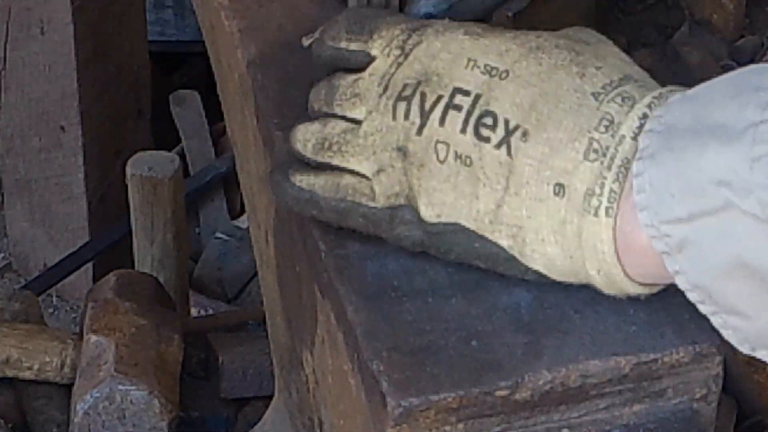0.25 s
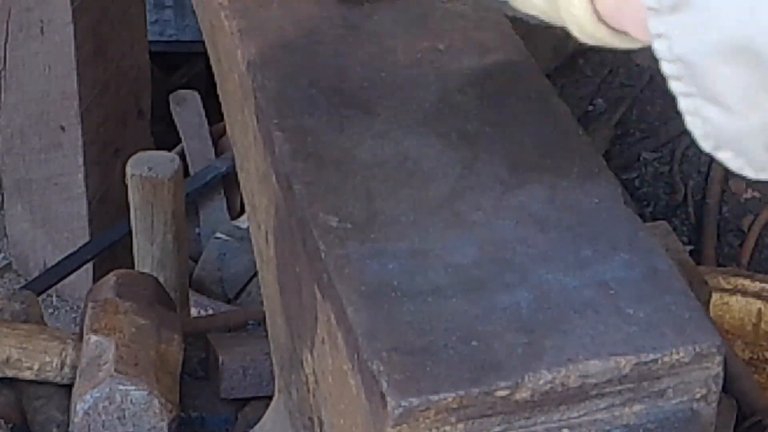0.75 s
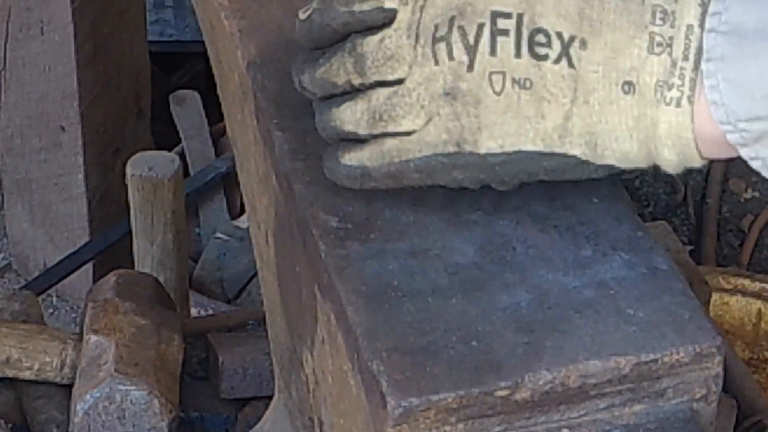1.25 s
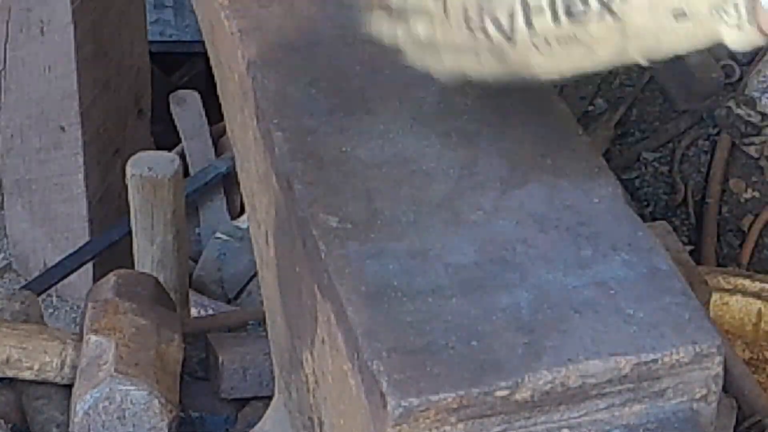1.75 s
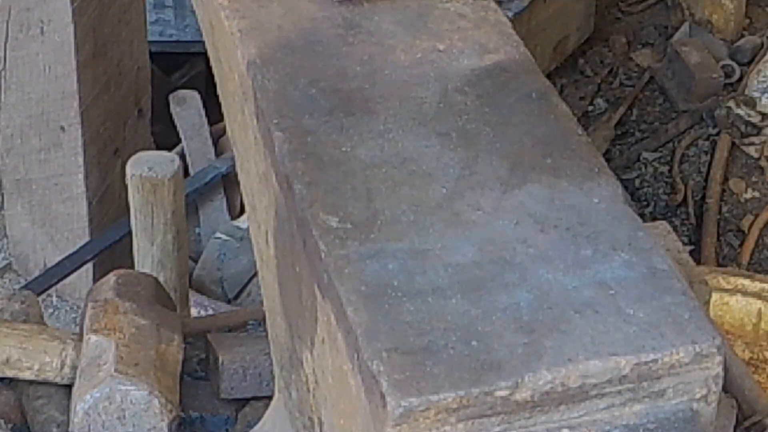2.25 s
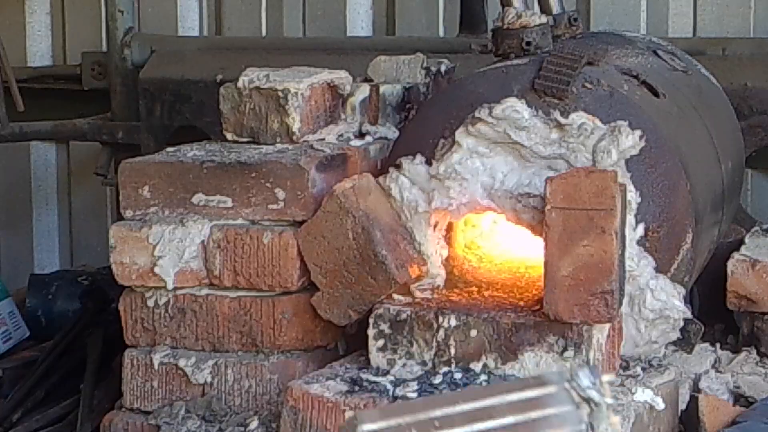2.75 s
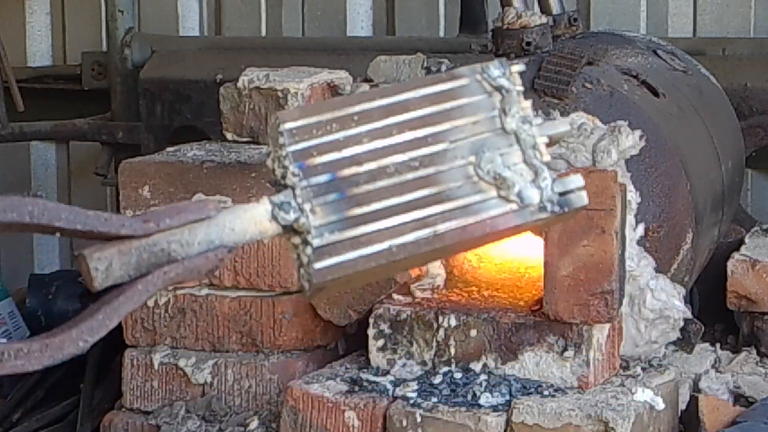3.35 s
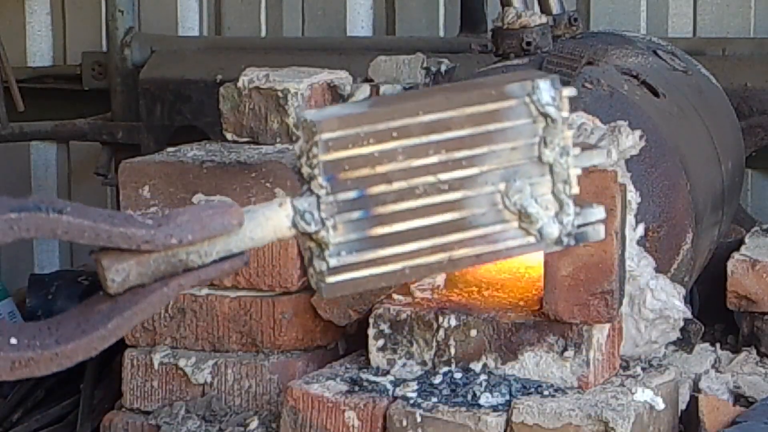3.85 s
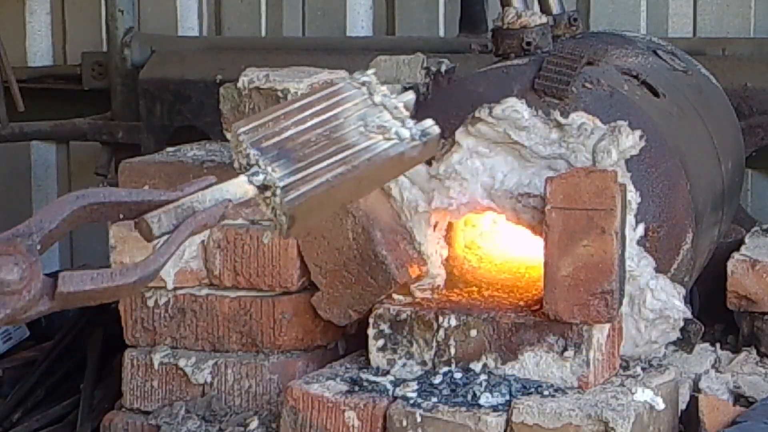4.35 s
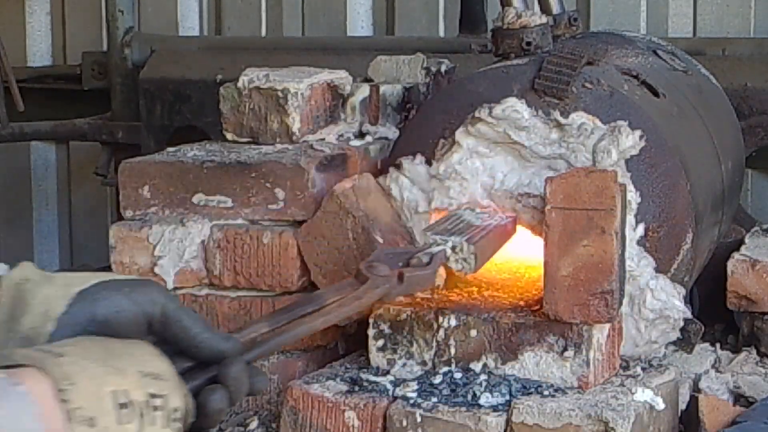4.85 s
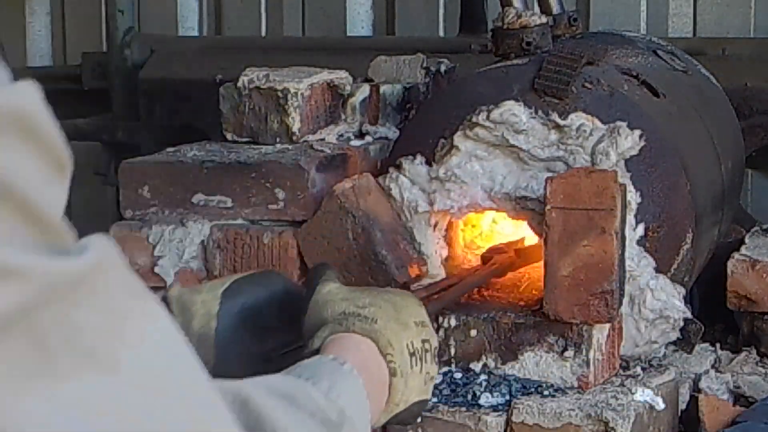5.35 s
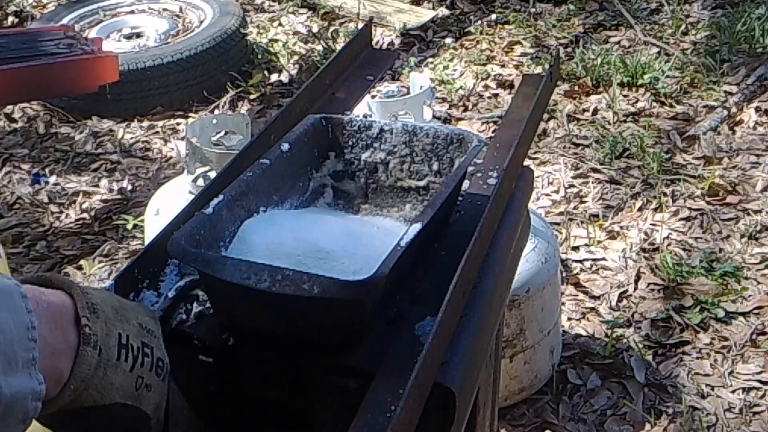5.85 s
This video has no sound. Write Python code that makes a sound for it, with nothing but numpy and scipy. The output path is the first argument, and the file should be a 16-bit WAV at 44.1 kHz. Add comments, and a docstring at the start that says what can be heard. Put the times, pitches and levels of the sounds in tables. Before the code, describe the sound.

From 0 to 2.6 s, close at an anvil, a thin quiet hiss lies under small steel strips being stacked. A soft low glove rub fades by 0.25 s. Sharp bright clicks with very short rings and small dull knocks come at about 0.06, 0.6, 0.87, 1.12, 1.57-1.6 and 2.32 s, with tiny ticks between, faint gritty slides near 2.05 and 2.5 s, and barely audible gliding hums. The loudest clack at 2.61 s is cut short into a sliver of silence. At 2.65 s a close propane forge starts abruptly: steady hissing jet with a reedy whistle near 2.8 kHz, fizzing treble and low flame roar, swelling gently to 4.2 s, then easing. Tongs scrape brick at 4.65, faintly at 4.96, and repeatedly from 5.37 s. At 5.65 s the burner is suddenly farther away in a yard; dry leaves crunch at 5.83 and in a cluster from 6.04 s.

```python
"""A smithy, heard in three scenes with hard cuts. At the anvil steel strips click, slide and ring over a thin hiss:
ticks are bursts of decaying noise through resonances, slides are swarms of random grains.
After a short silence a propane forge burns close by: flame and gas jet are noise shaped by chamber and burner tube,
and tongs scrape on brick. Then the burner is heard from the yard, where steps crunch in dry leaves."""
import sys
import numpy as np
from scipy import signal
from scipy.fft import rfft, irfft
from scipy.io import wavfile
from scipy.ndimage import map_coordinates

SR = 44100
rng = np.random.default_rng(int(sys.argv[2]) if len(sys.argv) > 2 else 0)


def store_pcm(level_fs):
    """Save levels as 16-bit WAV."""
    pcm = np.round(np.clip(level_fs, -1, 1) * 32767).astype(np.int16)
    wavfile.write(sys.argv[1], SR, np.atleast_2d(pcm).T)


N = 269010
HZ, T = np.fft.rfftfreq(N, 1 / SR), np.arange(N) / SR  # frequency and time axes
BENCH_END, FORGE_START, YARD_START = 2.6135, 2.653, 5.655  # s

# Strip against strip. Each row: start in seconds, relative tick level in dB, relative level of the knock
# into the anvil in dB, chatter decay in seconds, strongest ring in Hz, lift of the lower bending ring in dB.
CLICKS = [(0.06, -3.5, -11, 0.0059, 6000, -6), (0.1092, -19, -39.5, .002, 6000, -15),
          (0.6007, -5, -14, 0.0016, 9400, -11), (0.8728, -6.5, -24, 0.004, 8760, -20),
          (1.1158, -3, -10.5, 0.0046, 5400, -15), (1.398, -24.5, -48, .001, 13400, -15),
          (1.5687, -7, -12.5, 0.0013, 12000, -10), (1.6065, -9, -18.5, 0.0019, 11600, -8),
          (1.734, -24, -53, 0.00097, 8580, -15), (2.178, -21.5, -44.5, .0015, 7400, -15),
          (2.3188, -7, -24, 0.0016, 7600, -9), (2.6110, 5, -8.5, 0.0034, 7400, 8)]
# Brightness of steel touching steel. Each row: frequency in Hz, level in dB.
STEEL_COLOUR = [(150, -42), (1000, -31), (3000, -19), (4500, -9), (6000, -4), (7500, -1), (9700, 0),
                (12400, -1), (13600, -7), (15000, -7), (15800, -12)]
# Strips sliding into line. Each row: start in seconds, relative level in dB, length scale in seconds,
# ring in Hz, gritty low part in dB relative to the slide.
SLIDES = [(2.025, -38, 0.027, 6440, -12.5), (2.094, -44, 0.024, 7500, -2.5), (2.479, -38, .025, 6000, -1.5),
          (2.518, -47.5, 0.061, 11000, -20), (2.56, -39.5, 0.037, 7500, -27)]
# Spectrum of the gas jet. Each row: frequency in Hz, level in dB.
JET = [(300, -22), (750, -7.5), (1200, -1.5), (1600, -3.5), (2400, 3.5), (3400, -1.5), (4300, 1),
       (5200, -1.5), (6400, -2.5), (7700, -6), (9000, -13), (11000, -19), (14000, -16.5), (15500, -31)]
# Resonances of the burner tube. Each row: centre in Hz, width in Hz, lift in dB.
TUBE = [(826, 29, 13.5), (926, 29, 11.5), (1030, 20, 4), (1170, 32, 3), (1396, 68, 4), (1494, 57, 8.5),
        (1702, 78, 6), (1944, 67, 4), (2023, 51, 3), (2385, 40, 2.5), (2500, 66, 4), (2801.5, 111, 17),
        (2946, 174, 10), (3260, 110, 4), (3928, 108, 10.5), (4070, 127, 8.5), (4266, 165, 5.5),
        (4620, 220, 9), (4754, 130, 10), (5672, 183, 8.5), (5858, 324, 11), (6926, 160, 12.5),
        (8450, 270, 9.5)]
# Dry leaves crushed underfoot. Each row: start in seconds, relative level in dB, length scale in seconds,
# ring in Hz, low crack in dB relative to the crunch.
CRUNCHES = [(5.834, -26, 0.021, 4470, -17), (6.035, -27.5, .015, 4200, -9.5), (6.057, -26, 0.0096, 4570, 1),
            (6.07, -28, .014, 5900, -4), (6.087, -29.5, 0.023, 5750, -14)]
# The flame swells once and eases off on both sides of its height.
ROAR_TOP_S, ROAR_TOP_DB, ROAR_RISE_DB_PER_S, ROAR_FALL_DB_PER_S = 4.24, -37.5, 1.2, 2


def amp(db):
    """Decibels are a logarithmic measure of amplitude, 20 dB to a factor of ten."""
    return 10 ** (np.asarray(db) / 20)


def unit(x):
    """Normalisation: dividing by the root mean square gives unit power."""
    return x / np.sqrt(np.mean(x ** 2) + 1e-20)


def add(mix, s, sound):
    """Superposition: adds a sound in place from s seconds on, cut at the end of the mix."""
    part = mix[max(round(s * SR), 0):][:len(sound)]
    part += sound[:len(part)]


def shape(points, peaks=()):
    """Spectral envelope in dB: a smooth curve over log frequency plus bell-shaped resonances."""
    f, db = np.transpose(points)
    envelope = np.interp(np.log(HZ + 1), np.log(f), db)
    for hz, width, lift in peaks:
        envelope = envelope + lift / (1 + (2 * (HZ - hz) / width) ** 2)
    return envelope


def colour(x, db):
    """Minimum-phase filter of unit power gain: its phase is the Hilbert transform of its log gain."""
    log_gain = np.log(unit(amp(db)) + 1e-6)
    mirrored = np.r_[log_gain, log_gain[-2:0:-1]]
    phase = -signal.hilbert(mirrored).imag[:len(HZ)]
    return irfft(rfft(x) * np.exp(log_gain + 1j * phase), N)


def noise(db):
    """Stationary turbulence: Gaussian noise of rms 1 with the given spectrum."""
    return unit(irfft(rfft(rng.standard_normal(N)) * amp(db), N))


def flutter(rate_hz, depth_db):
    """Random amplitude modulation: a gain whose dB value is low-passed noise of rms depth_db."""
    return amp(depth_db * noise(-10 * np.log10(1 + (HZ / rate_hz) ** 4)))


def tinted(x, hz, ring_db, q):
    """Resonance: a single damped mode of the touched object adds its ring to the excitation."""
    b, a = signal.iirpeak(hz, q, fs=SR)
    return x + amp(ring_db) * signal.lfilter(b, a, x)


def rasp(strokes, grain_db, per_s, ring_db, clumps=1):
    """Friction and fracture as a random pulse train; each stroke rises fast and dies away, clumps modulate it."""
    grain_size = amp(grain_db * np.minimum(rng.exponential(1, N), 4))
    happens = rng.random(N) < per_s / SR
    grains = clumps * rng.standard_normal(N) * grain_size * happens
    out = np.zeros(N)
    for s, db, length, hz in strokes:
        u = T[:int(3 * length * SR)] / length
        envelope = (1 - np.exp(-14 * u)) * np.exp(-1.2 * u ** 2)
        swarm = np.roll(grains, -int(s * SR))[:len(u)] * envelope
        add(out, s, amp(db) * unit(tinted(swarm, hz, ring_db, q=12)) / np.sqrt(5))
    return out


def room(x, t60, wet_db):
    """Diffuse reverberation: nearby walls and tools return an exponentially decaying noise tail."""
    t = T[:SR // 3]
    tail = rng.standard_normal(len(t)) * amp(-60 * t / t60) * (t > .002)
    return x + amp(wet_db) * signal.fftconvolve(x, tail / np.linalg.norm(tail))[:N]


def reflected(x):
    """Comb interference: a few early echoes ripple the spectrum, at unchanged mean power gain."""
    # Bricks and walls nearby. Each row: delay in seconds, share of the direct amplitude.
    walls = [(.0049, .08), (0.009, .15), (0.017, .12), (0.0262, .12)]
    paths = 1 + sum(share * np.exp(-2j * np.pi * HZ * delay) for delay, share in walls)
    return irfft(rfft(x) * paths / np.sqrt(np.mean(abs(paths) ** 2)), N)


def bench_hiss():
    """Resonance-filtered noise: a thin hiss whose level flutters slightly."""
    # Each row: frequency in Hz, level in dB per Hz.
    hiss_spectrum = [(30, -28), (70, -18), (120, -12), (400, -10), (1000, -13), (1600, -11.5), (2500, -6.5),
                     (4300, -6.5), (6500, -1.5), (10000, -1.5), (12800, -3), (14000, -8), (15700, -13)]
    # Each row: resonance in Hz, width in Hz, lift in dB.
    hiss_peaks = [(234, 58, 5.5), (352, 59, 5.5), (3140, 220, 3.5), (5743, 600, 16), (8030, 670, 5.7),
                  (11470, 730, 9.5), (11980, 320, 10)]
    return amp(-46) * reflected(noise(shape(hiss_spectrum, hiss_peaks))) * flutter(25, 0.6)


def glove():
    """Stick-slip friction: the glove drags over the anvil in random soft bumps, then comes to rest."""
    # Each row: frequency in Hz, level in dB.
    glove_colour = [(30, -12), (80, -3.5), (180, 1.5), (330, -1), (580, -12), (900, -22), (3000, -54)]
    stop_s, release_s = 0.25, .03
    drag = np.clip((stop_s - T) / release_s, 0, 1)
    bumps = flutter(rate_hz=70, depth_db=3.2)
    return amp(-57.5) * drag * unit(noise(shape(glove_colour)) * bumps)


def clicks():
    """Impact excites modes: a sharp tick and chatter ring the strips while the anvil takes a dead knock."""
    # Ring of the strips. Each row: frequency in Hz, level in dB, 60 dB decay time in seconds.
    strips = [(4400, -29, 0.025), (5310, -1, 0.048), (6060, -13, 0.055), (7730, 0, 0.036),
              (8550, -27, 0.031), (9580, 6, 0.037), (10650, -2, 0.034), (12230, 9, .03)]
    # Each row: frequency in Hz, level in dB.
    knock_colour = [(25, -1), (150, -5), (400, -1), (750, -1), (1100, -4), (1800, -1.5), (3200, -2),
                    (6000, 5), (15000, -19)]
    low_ring_ratio = 0.583  # lower bending mode, as a share of the strongest ring
    t = T[:SR // 16]
    ticks, knocks = np.zeros(N), np.zeros(N)
    for s, db, knock_db, chatter, hz, low_ring_db in CLICKS:
        contact = rng.standard_normal(len(t)) * np.exp(-t / chatter)
        contact[0] = 1.4  # the first touch
        contact = tinted(contact, hz, ring_db=4.0, q=8.7)
        contact = tinted(contact, hz * low_ring_ratio, low_ring_db, q=15)
        add(ticks, s, amp(db) * contact / np.linalg.norm(contact))
        add(knocks, s, amp(knock_db) * np.ones(1))  # a single impulse
    ring = sum(amp(db - 60 * t / t60) * np.cos(2 * np.pi * hz * t) for hz, db, t60 in strips)
    ticks += amp(-14) * signal.fftconvolve(ticks, ring / np.linalg.norm(ring))[:N]
    steel = room(colour(ticks, shape(STEEL_COLOUR)), t60=0.071, wet_db=-8)
    return steel + room(colour(knocks, shape(knock_colour)), t60=0.019, wet_db=-9)


def hums():
    """Frequency glide: integrating a moving frequency gives the phase of faint hums that swell and fade."""
    # Each row: start in seconds, length in seconds, start pitch in Hz, end pitch in Hz, relative level in dB.
    glides = [(0.70, 0.12, 507, 519, -65), (1.979, 0.66, 364, 356, -69), (2.382, 0.3, 349, 342, -61.5)]
    out = np.zeros(N)
    for s, length, start_hz, end_hz, db in glides:
        hz = np.linspace(start_hz, end_hz, int(length * SR))
        tone = np.sin(2 * np.pi * np.cumsum(hz) / SR)
        add(out, s, amp(db) * np.hanning(len(hz)) * tone)
    return out * flutter(15, 1.7)


def slides():
    """Sliding friction: asperities release swarms of grains, a bright steel part and a gritty lower part."""
    # Each row: frequency in Hz, level in dB.
    grit_colour = [(200, -27), (700, -9), (1500, -3.5), (2400, -3), (4500, -1), (8000, 3.5), (15000, -36)]
    bright_strokes = [row[:4] for row in SLIDES]
    grit_strokes = [(s, db + low, length, 2350) for s, db, length, hz, low in SLIDES]
    bright = rasp(bright_strokes, grain_db=2, per_s=9400, ring_db=-6)
    grit = rasp(grit_strokes, grain_db=1.5, per_s=3300, ring_db=-17)
    steel = room(colour(bright, shape(STEEL_COLOUR)), t60=0.071, wet_db=-8)
    return steel + room(colour(grit, shape(grit_colour)), t60=0.019, wet_db=-9)


def roar_level():
    """Linear dB ramps, that is exponential growth and decay, set the strength of the flame."""
    rise = ROAR_RISE_DB_PER_S * (ROAR_TOP_S - T)
    fall = ROAR_FALL_DB_PER_S * (T - ROAR_TOP_S)
    return ROAR_TOP_DB - np.maximum(rise, fall)


def flame():
    """Combustion roar: low broadband noise excites the resonances of the chamber and the shed."""
    # Each row: frequency in Hz, level in dB.
    roar = [(25, -45), (50, -33), (80, -19.5), (130, -15), (230, -8.5), (330, -10.5), (460, -2),
            (620, -10.5), (720, -19), (1100, -36), (3000, -60)]
    # Resonances and hollows. Each row: centre in Hz, width in Hz, lift in dB.
    chamber = [(96.2, 8.7, 9.5), (144.4, 8.7, 10.5), (164.5, 12.5, -8), (197.6, 7.8, 9), (221.7, 16, 8.5),
               (250, 24, 5), (272.8, 13, 6.5), (297, 15, -9.5), (331, 43, 7), (358, 9.4, -6),
               (395.5, 22, 7.5), (464, 21, 1), (575, 10, -2), (601, 15, 3.5), (630, 21, 4.5)]
    return amp(roar_level()) * noise(shape(roar, chamber)) * flutter(41, 0.59)


def jet():
    """Jet turbulence excites tube modes; reading the noise at a varying rate makes their pitch drift."""
    # Slow drift of the tube. Each row: time in seconds, factor on its pitch.
    tube_drift = [(3.15, 0.98), (5.0, 1), (5.5, 1.002)]
    tube = shape(JET, TUBE)
    side = (HZ / 5000) ** 12 + 1e-9  # hiss lies below 5 kHz, fizz above
    read_at = [np.cumsum(np.interp(T, *np.transpose(tube_drift)))]  # in samples
    hiss = map_coordinates(noise(tube - 10 * np.log10(1 + side)), read_at, order=5, mode="wrap")
    fizz = map_coordinates(noise(tube - 10 * np.log10(1 + 1 / side)), read_at, order=5, mode="wrap")
    # the broad rush below the main whistle swells with the flame
    rush_hz, rush_db, rush_follow = 2000, .7, 0.57  # upper edge, lift, dB per dB of roar
    rush = irfft(rfft(hiss) / (1 + (HZ / rush_hz) ** 8), N)
    hiss = hiss - rush + rush * amp(rush_db + rush_follow * (roar_level() - ROAR_TOP_DB))
    fizz_db = -42 + 0.58 * (T - FORGE_START)  # grows by 0.58 dB per second
    gas = amp(-35.5) * hiss + amp(fizz_db) * fizz * flutter(5.1, 1.0)
    return reflected(gas * flutter(35, 0.33))


def tongs():
    """Scraping friction: tongs and billet on firebrick release ringing swarms of grains."""
    # Each row: start in seconds, relative level in dB, length scale in seconds, ring in Hz.
    scrapes = [(4.648, -33, 0.031, 6200), (4.96, -42.5, 0.09, 7350), (5.365, -40.5, 0.047, 5195),
               (5.46, -48, .02, 7000), (5.538, -41, 0.054, 4200), (5.615, -43, 0.044, 4720)]
    # Each row: frequency in Hz, level in dB.
    scrape_colour = [(1000, -31), (3000, -2), (4500, 2), (6500, -1), (8500, -5.5), (10500, -18),
                     (14000, -18), (15800, -29)]
    scraping = rasp(scrapes, grain_db=1.5, per_s=6000, ring_db=2)
    return room(colour(scraping, shape(scrape_colour)), t60=0.11, wet_db=-8)


def yard_burner():
    """Distance alters level and balance: the same burner as two steady noises, heard from farther off."""
    # Each row: frequency in Hz, level in dB.
    yard_roar = [(25, -30), (60, -12), (120, -8.5), (220, -7.5), (335, 5), (420, -3), (530, -6), (630, -2),
                 (740, -19), (1100, -26), (3000, -57)]
    # The rush is weaker. Each row: centre in Hz, width in Hz, lift in dB (0 leaves the band as it is).
    yard_tilt = [(1410, 1500, -1), (14000, 5000, 0)]
    far_flame = amp(-42.5) * noise(shape(yard_roar)) * flutter(25, 0.82)
    far_jet = amp(-38.5) * reflected(noise(shape(JET, TUBE + yard_tilt)))
    return far_flame + far_jet


def steps():
    """Brittle fracture: dry leaves give way in random clumps of fine crackles and lower cracks."""
    # Brightness of the leaves. Each row: frequency in Hz, level in dB.
    leaf_colour = [(300, -21), (1200, -15), (2300, -7), (3200, 2), (4600, -0.5), (5700, 1), (7000, -3),
                   (9000, -15.5), (11000, -22), (14200, -17), (15800, -39)]
    # Colour of the cracks. Each row: frequency in Hz, level in dB.
    crack_colour = [(200, -13), (1000, -11), (1600, 0), (3000, 6), (4500, -20), (8000, -25), (15000, -44)]
    clumps = flutter(rate_hz=160, depth_db=3.5)
    leaf_strokes = [row[:4] for row in CRUNCHES]
    crack_strokes = [(s, db + low, length, 1750) for s, db, length, hz, low in CRUNCHES]
    leaves = rasp(leaf_strokes, grain_db=1.5, per_s=5600, ring_db=7.5, clumps=clumps)
    cracks = rasp(crack_strokes, grain_db=1.0, per_s=4000, ring_db=-5, clumps=clumps)
    crunch = colour(leaves, shape(leaf_colour)) + colour(cracks, shape(crack_colour))
    return room(crunch, t60=0.09, wet_db=-5.0)


def dulled(x, notch_hz, width_hz, depth_db):
    """Band rejection: a bell-shaped attenuation leaves a narrow hollow in the top treble."""
    hollow_db = -depth_db / (1 + (2 * (HZ - notch_hz) / width_hz) ** 2)
    return irfft(rfft(x) * amp(hollow_db), N)


def scene():
    """Superposition of sources: anvil, forge and yard follow each other, the same in both channels."""
    anvil = (bench_hiss() + glove() + clicks() + hums() + slides()) * (T < BENCH_END)
    forge = flame() + jet() + tongs()
    yard = yard_burner() + steps()
    burner = dulled(np.where(T < YARD_START, forge, yard), notch_hz=12100, width_hz=640, depth_db=34)
    mono = anvil + burner * np.clip((T - FORGE_START) / 0.012, 0, 1)  # 12 ms fade-in
    return np.array([mono, mono])


def record(dry):
    """Band limiting: a symmetric low-pass removes the treble above 15.8 kHz without phase distortion."""
    lowpass = signal.firwin(301, 15800, window=("kaiser", 8), fs=SR)
    return signal.oaconvolve(dry, lowpass[None], "same")


dry = scene()
out = record(dry)
store_pcm(out)
```